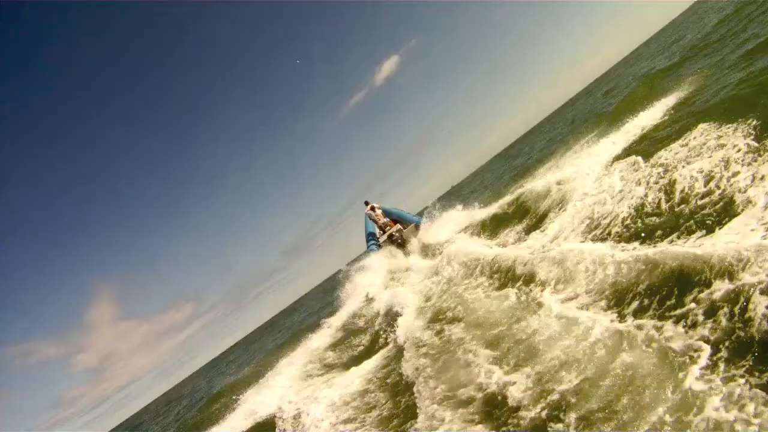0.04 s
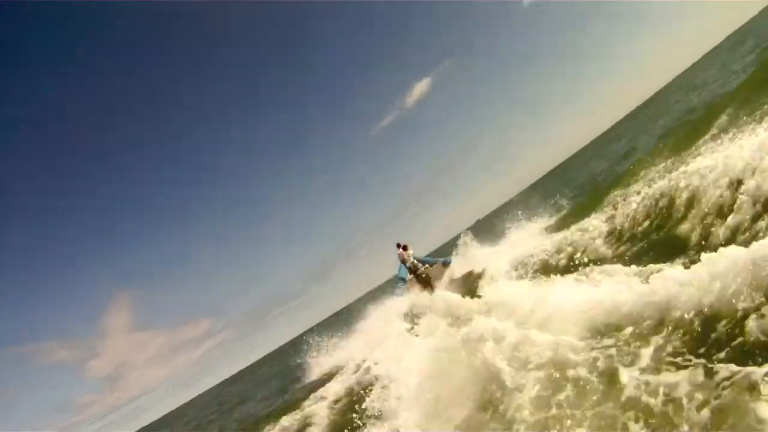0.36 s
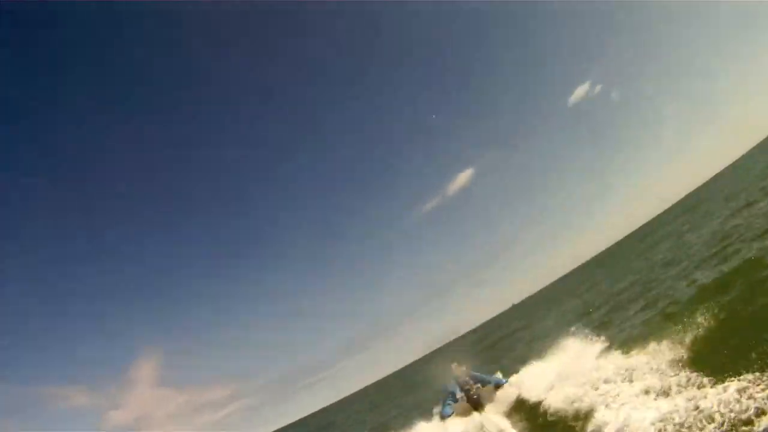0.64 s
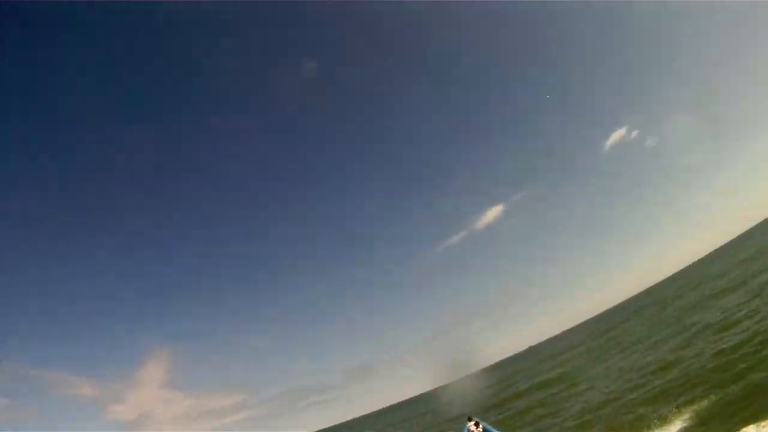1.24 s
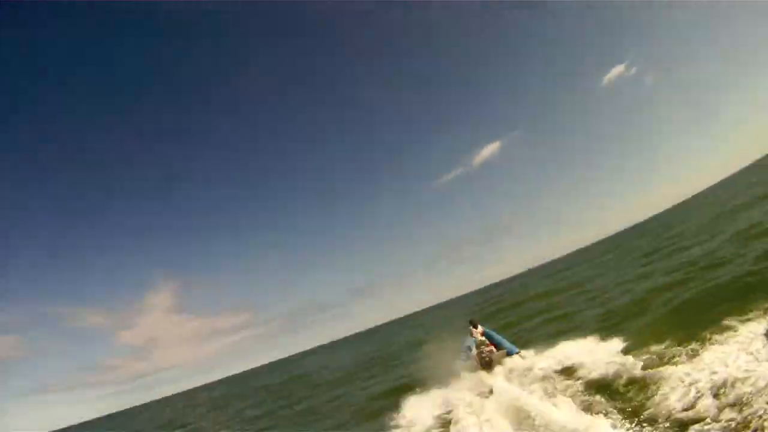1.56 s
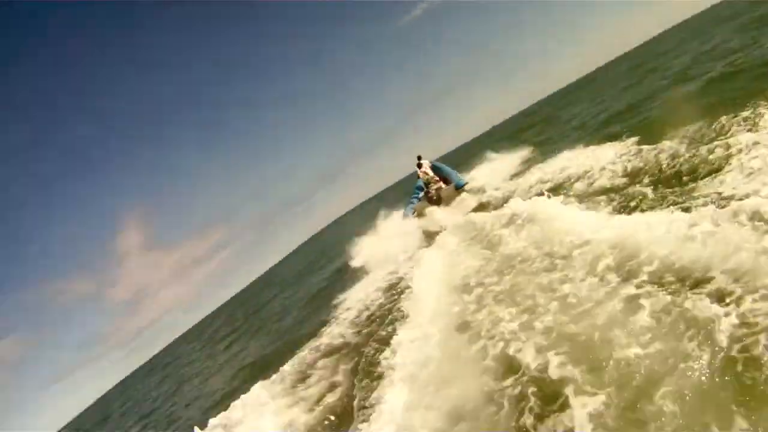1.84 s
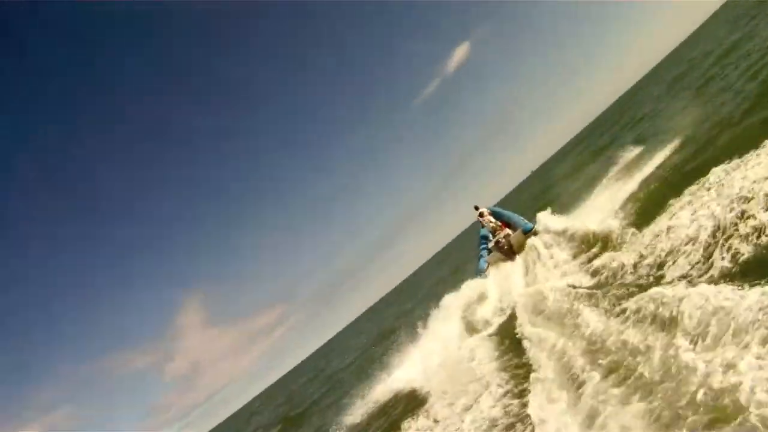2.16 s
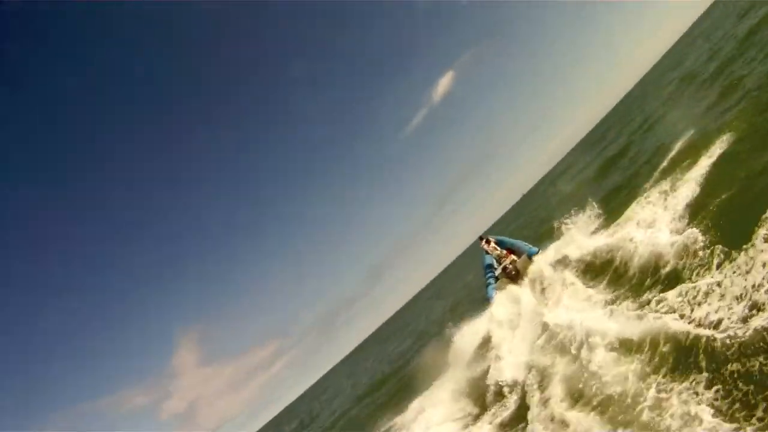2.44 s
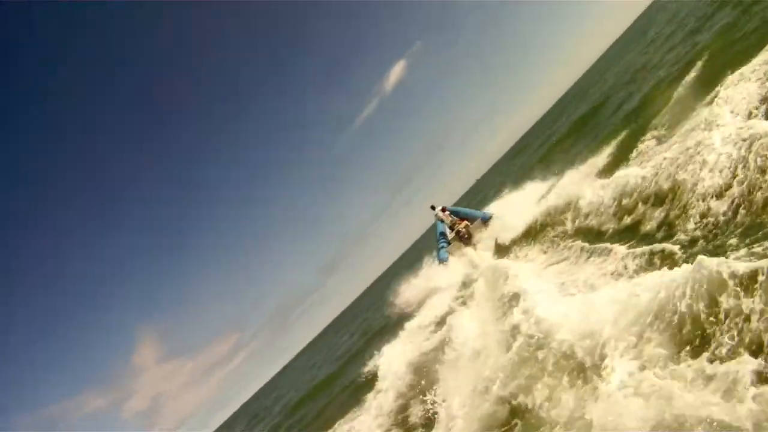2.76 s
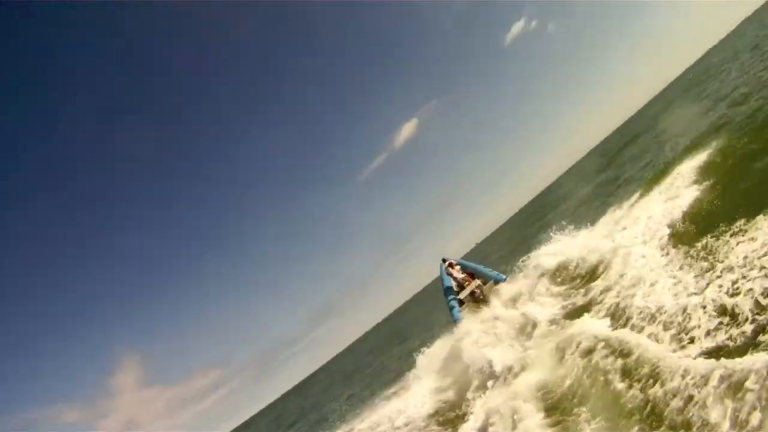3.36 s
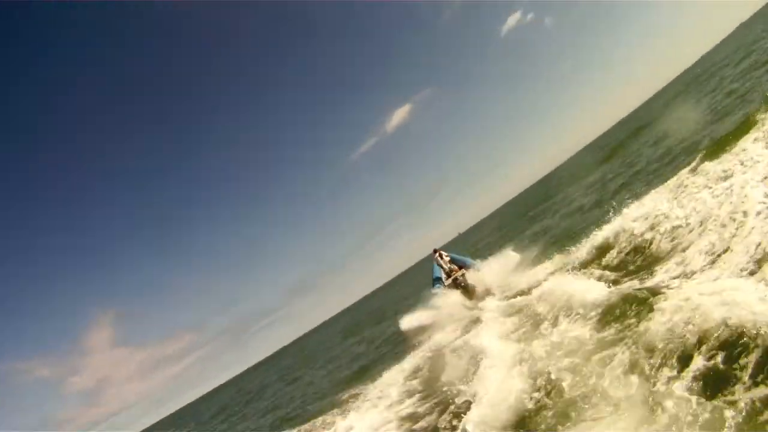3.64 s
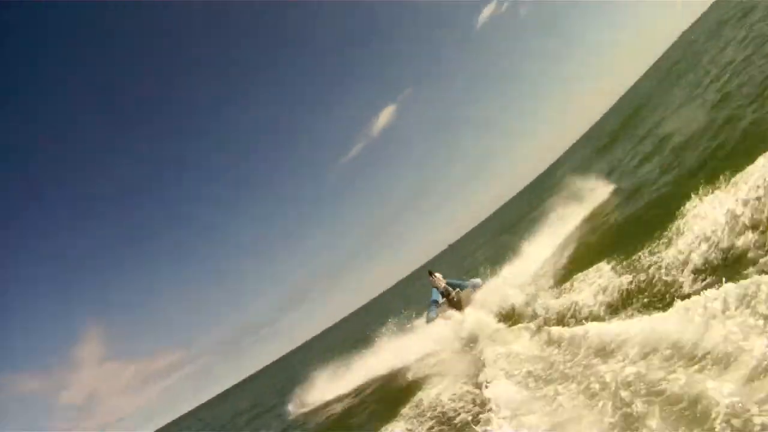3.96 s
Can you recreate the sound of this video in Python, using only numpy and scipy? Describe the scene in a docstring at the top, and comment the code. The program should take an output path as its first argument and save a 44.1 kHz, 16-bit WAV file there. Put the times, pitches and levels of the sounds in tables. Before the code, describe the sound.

A motorboat runs across rough water, its low engine hum rising out of wind rumble and hiss. Heard from a small waterproof case above the wake, showers of spray rattle the shell, with three loud, sharp slaps of water.

```python
"""An inflatable boat runs over choppy sea, heard from a small waterproof housing above its wake.
First wind rumbles and hisses round the housing; by 0.6 s the outboard engine's harmonic drone has risen,
and brief low hums follow. From 1.4 s showers of spray knock on the shell and excite its modes.
Near 1.9, 3.0 and 3.8 s hard slaps of water ring the microphone port and overload the microphone;
each time a limiter ducks everything and slowly recovers."""
import sys
import numpy as np
from scipy import signal
from scipy.fft import rfft, irfft, next_fast_len
from scipy.io import wavfile

SR = 44100
rng = np.random.default_rng(int(sys.argv[2]) if len(sys.argv) > 2 else 0)


def output_pcm(signal):
    """Save a mono or channel-first signal as 16-bit PCM at the path in sys.argv[1].

    Samples are clipped to [-1, 1] before scaling.
    """
    pcm = np.clip(np.atleast_2d(signal).T, -1, 1) * 32767
    wavfile.write(sys.argv[1], SR, np.round(pcm).astype(np.int16))


N = 176400
T = np.arange(N) / SR


def from_db(db):
    """Decibels to amplitude ratio."""
    return 10 ** (np.asarray(db) / 20)


def rms_one(x):
    """Normalisation to unit rms."""
    return x / np.sqrt(np.mean(x ** 2) + 1e-20)


def curve(rows):
    """Linear interpolation of (t/s, value) rows."""
    return np.interp(T, *np.transpose(rows))


def drift(rate):
    """Low-pass noise: a random wander of unit rms, with its corner at rate/Hz."""
    r = np.exp(-80 * np.pi * rate / SR)
    slow = signal.lfilter([1], [1, -2 * r, r * r], rng.standard_normal(N // 40 + 2002))[2000:]
    return np.interp(np.arange(N) / 40, np.arange(len(slow)), rms_one(slow))


def colour(x, spectrum, peaks=()):
    """Minimum-phase filter: a broad (f/Hz, gain/dB) shape times second-order resonances or notches."""
    size = 2 * next_fast_len(len(x) // 2 + 2048)
    f = np.maximum(np.arange(size // 2 + 1) * SR / size, 1)
    hz, db = np.transpose(spectrum)
    roll_off = np.minimum(f / hz[0], 1) * np.minimum(hz[-1] / f, 1) ** 2
    cepstrum = irfft(np.log(from_db(np.interp(np.log(f), np.log(hz), db)) * roll_off))
    cepstrum[1:size // 2] *= 2  # folding the cepstrum makes the filter causal
    cepstrum[size // 2 + 1:] = 0
    response = np.exp(rfft(cepstrum))
    for centre, width, boost in peaks:
        response *= 1 + (from_db(boost) - 1) / (1 + 1j * (f * f - centre ** 2) / (f * width))
    return irfft(rfft(x, size) * response)[:len(x)]


def add(out, start, sound):
    """Superpose a short sound at start/s."""
    i = int(start * SR)
    out[i:i + len(sound)] += sound[:max(N - i, 0)]


FIRING_RATE = [(0.12, 89), (1.4, 88), (2.05, 89), (2.25, 86.3), (2.83, 81.7), (3.15, 85), (3.4, 79.5),
               (3.75, 78), (4.0, 80)]  # cylinder firings (t/s, f/Hz)
ENGINE_LEVEL = [(0.42, -35), (0.6, -18.5), (0.97, -19.5), (1.15, -24), (1.5, -25.5), (1.9, -31.5),
                (2.1, -18.5), (2.45, -14), (2.8, -18.5), (2.92, -21.5), (4.0, -24)]  # drone envelope (t/s, level/dB)
EXHAUST_HARMONICS = [(1, -17), (2, 0), (3, -7), (4, -14), (5, -14), (7, -22), (11, -25), (12, -21)]  # exhaust note (harmonic number, relative level/dB)

def engine():
    """Periodic firing gives a harmonic series; a harmonic swells as it nears the exhaust resonance."""
    resonance_hz, half_width_hz, boost_db = 243, 6.8, 7
    firing_hz = curve(FIRING_RATE) * (1 + 0.002 * drift(11.5))
    phase, out = 2 * np.pi * np.cumsum(firing_hz) / SR, 0
    for k, db in EXHAUST_HARMONICS:
        swell_db = boost_db / (1 + ((k * firing_hz - resonance_hz) / half_width_hz) ** 2)
        flutter_db = 1.5 * drift(7.6)
        out += from_db(db + swell_db + flutter_db) * np.sin(k * phase + 2 * np.pi * rng.random())
    return rms_one(out) * from_db(curve(ENGINE_LEVEL))


SLAPS = [(1.9199, 20.5, 2180), (2.9636, 20, 2174), (3.041, 4, 1930), (3.746, -10, 2300), (3.7747, 23, 2013),
         (3.898, -8.5, 2100)]  # water striking the port (t/s, level/dB, f/Hz)
PORT_OVERTONES = [9850, 14180]  # upper modes of the struck port (f/Hz)
SPLATTER_SPECTRUM = [(150, -3), (700, 10.5), (1900, 13.5), (3500, 1.5), (6000, -20.5), (12000, -29)]  # noise of a slap (f/Hz, relative level/dB)

def slaps():
    """Impact excitation: struck by water, the port rings briefly, sagging in pitch; splatter trails off."""
    rise_s, sag_per_s, tail_s = 0.002, 3, 0.0051
    out, t = np.zeros(N), T[:SR // 20]
    age = t / rise_s
    pulse = age * np.exp((1 - age ** 2) / 2)
    tail = from_db(-21) * np.exp(-t / tail_s)
    overtones = from_db(-12.5) * sum(np.sin(2 * np.pi * f * t) for f in PORT_OVERTONES)
    for start, db, hz in SLAPS:
        ring = np.sin(2 * np.pi * hz * t * (1 - sag_per_s * (t / 2 - rise_s))) + overtones
        splatter = rms_one(colour(rng.standard_normal(len(t)), SPLATTER_SPECTRUM))
        add(out, start, from_db(db) * (pulse * (ring + 0.59 * splatter) + tail * splatter))
    return out


SHELL_RESPONSE = [(60, -3.5), (200, 4), (400, 2.5), (540, -8.5), (750, -4), (1300, -4.5), (2200, -12),
                  (2900, -24.5), (4200, -31), (6000, -47), (7700, -38.5), (10000, -24), (12000, -31),
                  (13800, -24.5), (16000, -56)]  # broad response of the shell to drops (f/Hz, gain/dB)
SHELL_MODES = [(645, 55, 7), (1005, 90, 10), (1500, 110, 9), (3650, 120, 17), (5080, 160, 7),
               (8330, 100, 18), (10500, 170, 10), (11000, 80, 10), (13000, 90, 10), (13500, 140, 9)]  # its resonances (f/Hz, bandwidth/Hz, gain/dB)
SPLASHES = [(0.302, -8, 0.003, -0.5), (0.309, -10.5, 0.023, 4.5), (0.512, -11, 0.0042, -4.5),
            (1.4113, -5.5, 0.0062, -1), (1.416, 5.5, 0.0057, 3.5), (1.434, -6, .004, -9),
            (1.467, -5, 0.0018, -3), (1.515, -8.5, 0.0095, -8.5), (1.633, -5, 0.0023, -6),
            (1.7158, -5.5, 0.0029, 1.5), (1.7358, 5.5, 0.0025, -5.5), (1.747, -4, 0.0066, 1),
            (1.776, -11, 0.0027, 5), (1.811, 2.5, 0.0014, 3), (1.834, -1, 0.0088, 1),
            (1.912, -11.5, 0.022, 5.5), (2.852, -6.5, 0.0022, 5), (2.914, 7.5, 0.0017, 1),
            (2.919, 10, 0.0021, 0.5), (2.955, -8, 0.019, 4), (3.063, -3, 0.0074, -6.5),
            (3.114, -6, 0.011, 0), (3.146, -4.5, 0.0051, -5.5), (3.23, 5, 0.0026, -3),
            (3.311, -4, 0.0036, -3), (3.332, -7.5, 0.0033, -7), (3.365, -6.5, 0.0068, -3),
            (3.412, -6, 0.011, -8.5), (3.448, -4, 0.01, -1.5), (3.466, -2, 0.0017, -3.5),
            (3.499, -6, 0.0053, -1), (3.534, 0.5, 0.0036, -4.5), (3.656, -14, 0.0074, 0.5),
            (3.71, -6.5, 0.0012, 11), (3.778, 22, 0.0012, -1.5), (3.831, -1.5, 0.0098, 5),
            (3.888, -0.5, 0.005, -3), (3.931, 1, 0.0038, 4), (3.959, -5, 0.0096, -4), (3.98, -2, .006, 2)]  # knocks on the shell (t/s, relative level/dB, decay time/s, thud/dB)

def splashes():
    """Modal ringing: each dying burst of drops excites the shell's modes in its own mix."""
    rise_s = 0.00046
    out, t = np.zeros(N), T[:SR // 10]
    for start, db, decay_s, thud_db in SPLASHES:
        modes = [(hz, width, boost + 3 * rng.uniform(-0.84, 1)) for hz, width, boost in SHELL_MODES]
        burst = rng.standard_normal(len(t)) * np.exp(-t / decay_s) * (1 - np.exp(-t / rise_s))
        knock = colour(burst, SHELL_RESPONSE, modes)
        # heavy water thuds (thud_db > 0), fine drops are crisp (thud_db < 0)
        tilt = [(20, 0), (500, thud_db), (1200, 0), (4000, -thud_db), (16000, 0)]
        add(out, start, from_db(db + 2.5) * colour(knock / np.abs(knock).max(), tilt))
    return out


SPRAY_LEVEL = [(0.12, -32.5), (0.55, -29.5), (0.7, -59), (1.3, -86), (1.42, -17), (1.68, -30), (1.82, -8.5),
               (1.9, -23.5), (2.4, -28.5), (2.75, -31.5), (2.87, -26.5), (3.1, -18), (3.48, -24.5),
               (3.59, -30), (3.72, -23.5), (4.0, -19.5)]  # envelope of the fine spray (t/s, level/dB)

def spray():
    """Shot noise: small drops strike the shell at random instants, in louder and softer clumps."""
    drops_per_s, spread_db, clump_db = 380, 3.8, 4.5
    sizes = from_db(spread_db * np.minimum(rng.exponential(1, N), np.pi)) * rng.choice([-1, 1], N)
    hits = rng.random(N) < drops_per_s / SR
    drops = sizes * hits * from_db(clump_db * np.tanh(drift(50)))
    return rms_one(colour(drops, SHELL_RESPONSE, SHELL_MODES)) * from_db(curve(SPRAY_LEVEL))


TICKS = [(1.602, -1.5), (1.674, -2.5), (2.594, -1.5)]  # single drops (t/s, peak level/dB)

def ticks():
    """Impulse response: a lone drop gives the shell one bright click."""
    out, impulse = np.zeros(N), np.zeros(SR // 20)
    impulse[:2] = 1, -0.35  # a partial difference favours the treble
    tick = colour(impulse, SHELL_RESPONSE, SHELL_MODES)
    for start, db in TICKS:
        add(out, start, from_db(db) * tick / np.abs(tick).max())
    return out


THUMPS = [(0.241, -4, 60.4), (1.428, 0.5, 64.6), (1.771, -3.5, 116), (1.882, -1.5, 88), (2.859, -2, 74.5),
          (3.708, -4, 135)]  # low pushes (t/s, level/dB, f/Hz)

def thumps():
    """Heavily damped oscillation: a push of wind or water dies within a cycle or two."""
    rise_s = 0.0049
    out, t = np.zeros(N), T[:SR // 10]
    envelope = t / rise_s * np.exp(1 - t / rise_s)
    for start, db, hz in THUMPS:
        add(out, start, -from_db(db) * envelope * np.sin(2 * np.pi * hz * t))
    return out


RUMBLE_SPECTRUM = [(15, 5.5), (32, 3), (55, 1.5), (100, -8), (170, -6.5), (300, -22.5), (500, -18.5),
                   (1200, -58.5)]  # wind on the housing (f/Hz, relative level/dB)
RUMBLE_LEVEL = [(0.12, -20), (0.24, -29), (0.28, -48), (0.33, -20), (0.6, -20), (0.95, -28), (1.3, -20.5),
                (1.88, -13), (2.1, -19.5), (2.75, -21.5), (2.88, -17), (3.15, -12.5), (3.55, -22.5),
                (3.72, -14), (4.0, -11)]  # its envelope (t/s, level/dB)
RUSH_SPECTRUM = [(60, -13), (140, 2.5), (220, 1.5), (330, -11.5), (520, -20.5), (1400, -23), (2200, -19.5),
                 (2900, -30.5), (4000, -40), (6000, -43.5), (8000, -43), (10000, -35.5), (14000, -39),
                 (16000, -41)]  # rush of wake and air (f/Hz, relative level/dB)
RUSH_LEVEL = [(0.12, -30.5), (0.24, -14), (0.26, -28.5), (0.36, -28), (0.6, -20), (0.85, -20.5), (1.0, -25),
              (1.35, -22.5), (1.6, -19), (2.0, -24), (2.3, -20), (2.8, -19.5), (3.1, -21), (4.0, -21)]  # its envelope (t/s, level/dB)
HOUSING_MODES = [(640, 45, 7), (1020, 80, 9), (1550, 130, 3), (3600, 150, 5), (11000, 90, 5)]  # resonances in that rush (f/Hz, bandwidth/Hz, gain/dB)

def wind():
    """Flow noise: wind rumbles unevenly on the housing; the rush of wake and air drives its resonances."""
    rumble = rms_one(colour(rng.standard_normal(N), RUMBLE_SPECTRUM))
    rumble *= from_db(curve(RUMBLE_LEVEL) + 2 * np.tanh(drift(22)))
    rush = rms_one(colour(rng.standard_normal(N), RUSH_SPECTRUM, HOUSING_MODES))
    rush *= from_db(curve(RUSH_LEVEL) + 1.92 * drift(72))
    return rumble + rush


HUMS = [(0.846, 0.25, 177, 178, -15.5), (0.994, 0.18, 150.3, 149, -16.5), (1.132, 0.19, 202, 224, -21),
        (1.224, 0.22, 213, 166, -16.5), (1.275, 0.29, 148.8, 159.8, -18),
        (2.442, 0.22, 204.6, 199.2, -19.5), (3.499, 0.071, 182.6, 193, -18)]  # brief low hums (t/s, duration/s, first f/Hz, last f/Hz, level/dB)
HUM_OVERTONES = [(3, -23)]  # their overtone (harmonic number, relative level/dB)
MICROPHONE_BAND = [(18, 0), (20000, 0)]  # edges of the flat passband (f/Hz, gain/dB)

def hums():
    """Amplitude and frequency modulation: a swell of the engine's drone, then gliding tones in the wind."""
    out, waver, flutter = np.zeros(N), 1 + 0.012 * drift(28), from_db(1.5 * drift(3.7))
    for start, duration, first_hz, last_hz, db in HUMS:
        progress = np.clip((T - start) / duration, 0, 1)
        hz = (first_hz + (last_hz - first_hz) * progress) * waver
        phase = 2 * np.pi * np.cumsum(hz) / SR
        tone = np.sin(phase) + sum(from_db(level) * np.sin(k * phase) for k, level in HUM_OVERTONES)
        out += from_db(db) * np.sqrt(2 * np.abs(np.sin(np.pi * progress))) * tone
    return colour(out * flutter, MICROPHONE_BAND, HOUSING_MODES)


GUSTS = [(0.143, 0.256, 0.0056, -27), (0.713, 0.914, 0.036, -23), (2.288, 2.536, 0.032, -21.5),
         (3.503, 3.58, .01, -33.5)]  # air crossing the port (start t/s, end t/s, edge time/s, level/dB)
HISS_SPECTRUM = [(500, -22), (1400, -13), (2150, -2), (2700, -4.5), (4500, -20), (6000, -27), (10000, -17),
                 (12000, -28), (14500, -21)]  # its noise (f/Hz, relative level/dB)
PORT_RESPONSE = [(2040, 150, 16), (2880, 180, -14), (3200, 160, 8), (8830, 150, 7), (9930, 240, 15),
                 (14090, 190, 17)]  # port resonances and one notch (f/Hz, bandwidth/Hz, gain/dB)

def port_hiss():
    """Flow-excited resonance: gusts blow across the microphone port; some stop abruptly."""
    envelope = sum(from_db(db) * (np.tanh((T - start) / edge / 2) - np.tanh((T - end) / edge / 2)) / 2
                   for start, end, edge, db in GUSTS)
    hiss = rms_one(colour(rng.standard_normal(N), HISS_SPECTRUM, PORT_RESPONSE))
    return hiss * envelope * from_db(2 * drift(61))


HOLLOW_BAND = [980, 1100]  # edges of one housing resonance (f/Hz)

def hollow_ring():
    """Forced resonance: rushing air briefly sounds the housing near one kilohertz."""
    centre_s, spread_s = 0.45, 0.091
    resonator = signal.butter(1, HOLLOW_BAND, "band", fs=SR, output="sos")
    ring = rms_one(signal.sosfilt(resonator, rng.standard_normal(N)))
    return from_db(-34.5) * ring * np.exp(-0.5 * ((T - centre_s) / spread_s) ** 2)


WHISTLE_BANDS = [(11800, 50, 40), (12210, 50, 39)]  # twin peaks (f/Hz, bandwidth/Hz, gain/dB)
WHISTLE_LEVEL = [(0.4, -60), (0.6, -47), (1.38, -46), (1.45, -62), (1.95, -60), (2.2, -47), (2.85, -47),
                 (2.95, -62)]  # envelope, with gaps for the spray (t/s, level/dB)

def whistle():
    """Narrow-band noise: two thin, high bands of hiss are heard as a whistle in the wind."""
    bands = colour(rng.standard_normal(N), [(9000, -30), (12000, 0), (15000, -30)], WHISTLE_BANDS)
    return rms_one(bands) * from_db(curve(WHISTLE_LEVEL))


FADE_IN = [(0.12, 0), (0.145, 0.91)]  # opening rise of the mix (t/s, gain)

def scene():
    """Superposition: all sources add at one microphone, which feeds both channels."""
    mono = engine() + whistle() + wind() + hums() + port_hiss() + hollow_ring()
    mono += spray() + ticks() + splashes() + thumps() + slaps()
    return np.array([mono, mono]) * curve(FADE_IN)


TREBLE_NOTCHES = [(6020, 800, -13), (12010, 170, -14)]  # hollows in the microphone's response (f/Hz, bandwidth/Hz, gain/dB)

def record(dry):
    """Limiting and saturation: overloads duck the gain, remaining peaks clip; the treble is filtered."""
    attack_s, release_s, ceiling, cutoff_hz = 0.003, 0.22, 0.84, 15400
    over_db = np.maximum(20 * np.log10(np.abs(dry).max(axis=0) + 1e-9), 0)
    release = np.exp(-T / release_s)
    held_db = np.maximum.accumulate(over_db / release) * release
    pole = np.exp(-1 / (attack_s * SR))
    duck_db = signal.lfilter([1 - pole], [1, -pole], held_db)
    limited = dry * from_db(-duck_db)
    clipped = limited / (1 + (limited / ceiling) ** 6) ** (1 / 6)
    notched = np.array([colour(channel, MICROPHONE_BAND, TREBLE_NOTCHES) for channel in clipped])
    return signal.sosfiltfilt(signal.butter(30, cutoff_hz, fs=SR, output="sos"), notched)


dry = scene()
out = record(dry)
output_pcm(out)
```